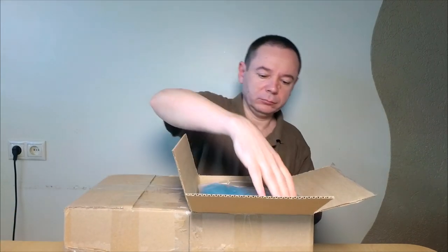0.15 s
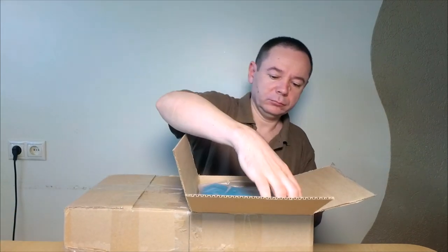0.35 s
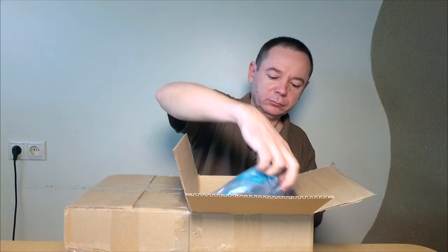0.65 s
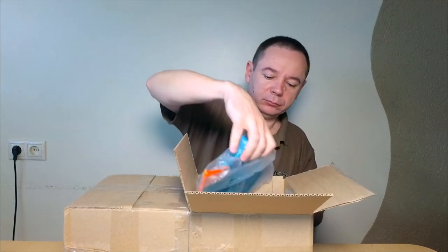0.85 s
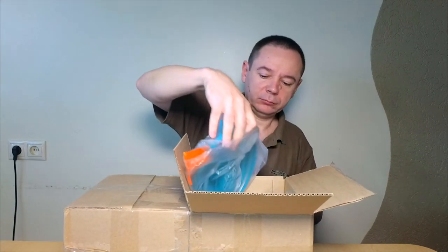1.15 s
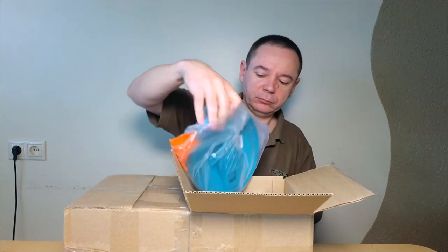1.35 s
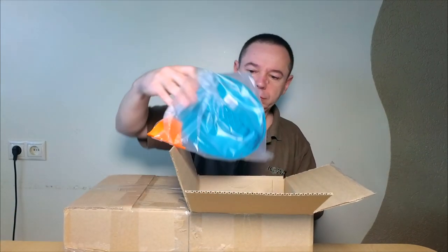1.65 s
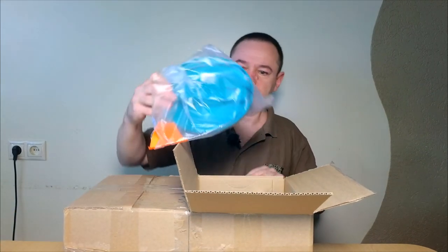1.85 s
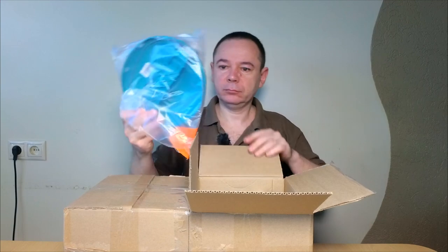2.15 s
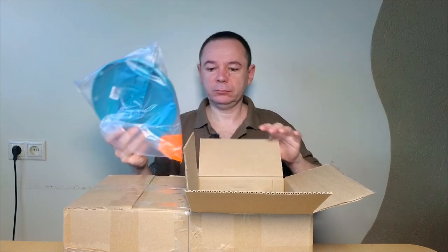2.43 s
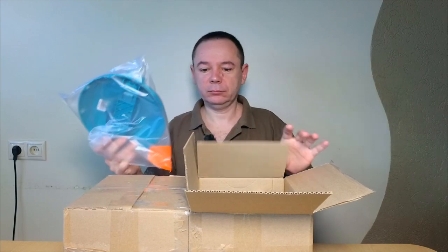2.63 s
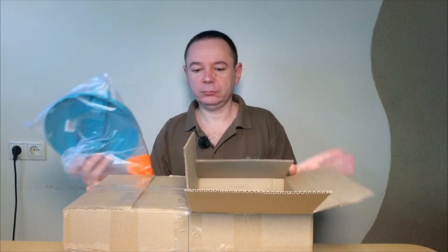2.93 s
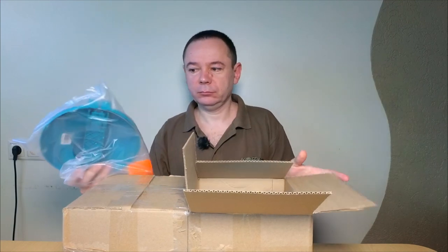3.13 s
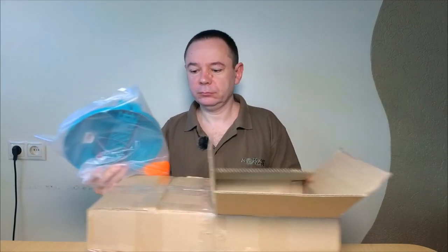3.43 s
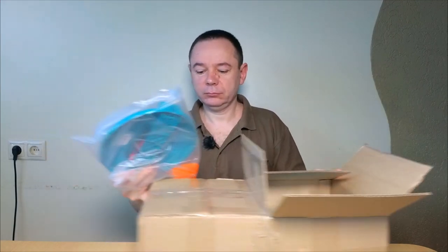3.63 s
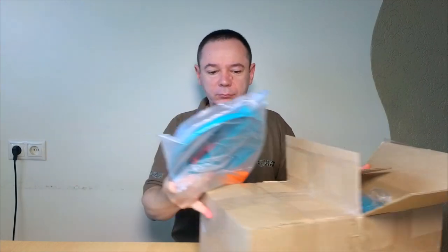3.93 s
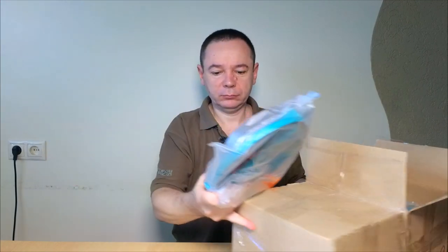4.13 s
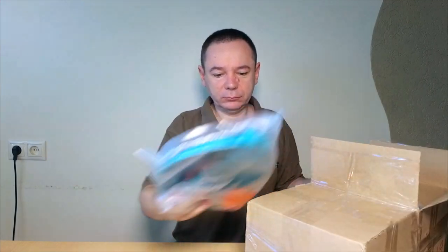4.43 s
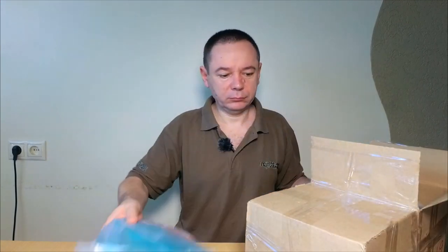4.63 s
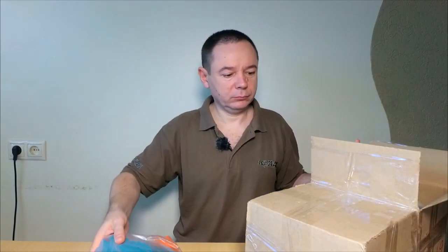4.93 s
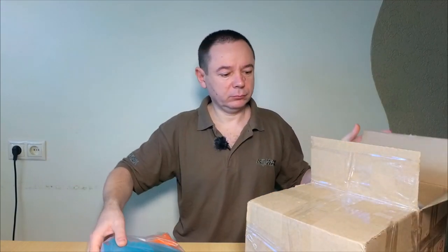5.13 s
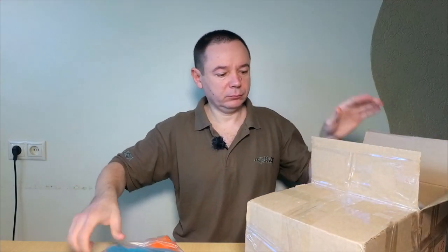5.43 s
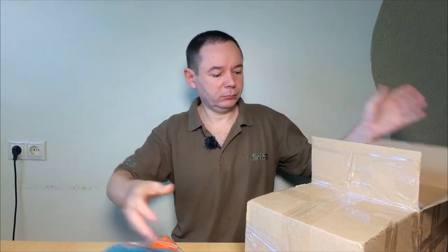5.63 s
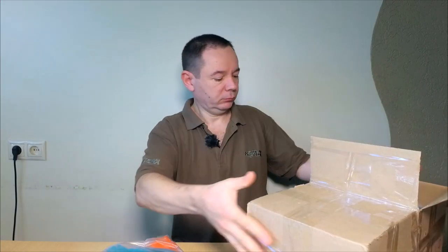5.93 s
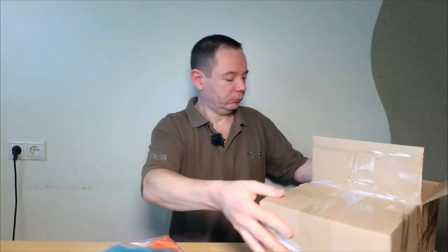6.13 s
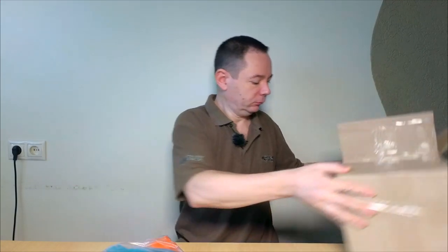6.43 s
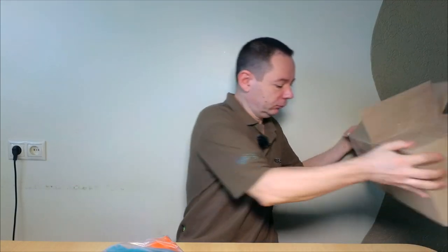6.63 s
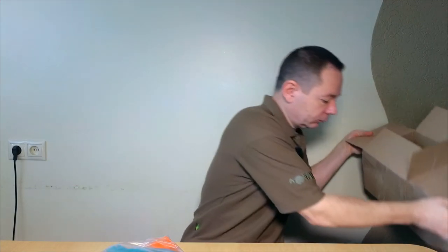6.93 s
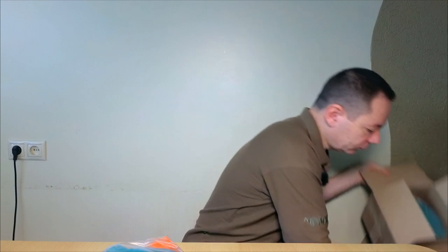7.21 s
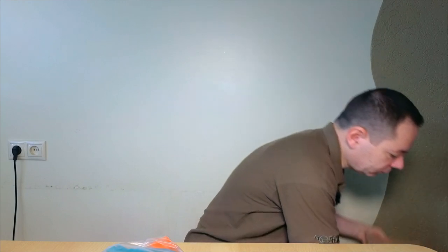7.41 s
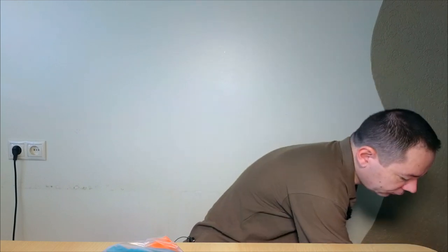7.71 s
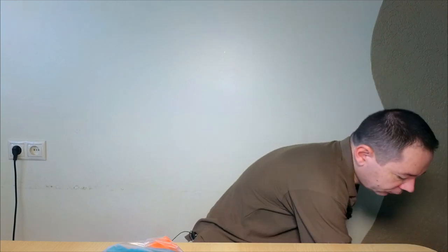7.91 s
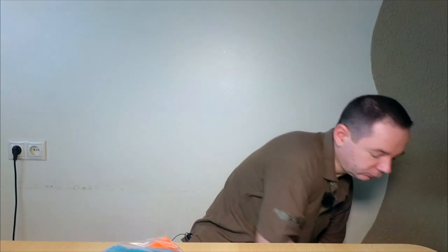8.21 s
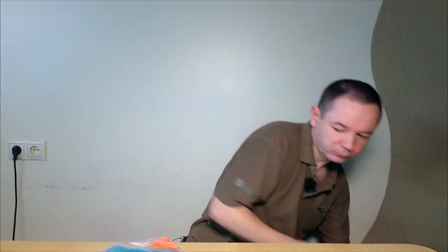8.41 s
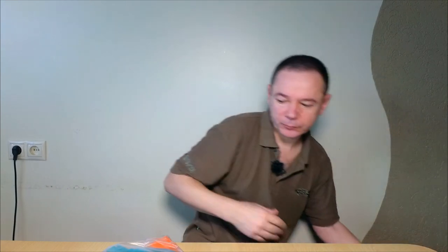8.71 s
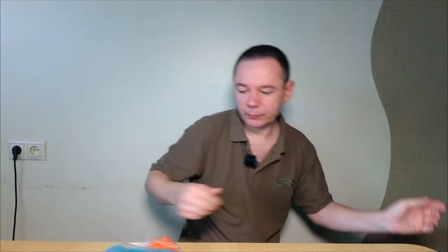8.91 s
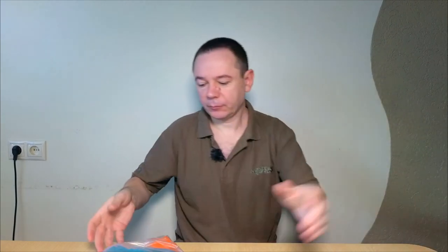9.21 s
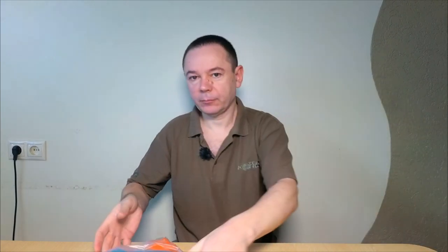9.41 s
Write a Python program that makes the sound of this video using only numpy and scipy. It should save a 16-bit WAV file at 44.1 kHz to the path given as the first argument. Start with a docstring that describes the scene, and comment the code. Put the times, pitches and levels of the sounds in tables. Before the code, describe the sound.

A small, fairly dry room with a low murmur and faint hiss, heard by a close microphone. After a near-silent start and a light knock at 0.4 s, plastic film bursts into dense, bright crackling from 0.5 to 1.5 s, with cardboard scraping and hollow knocks, strongest around 0.8. From 2 to 3.3 s come sparse crisp snaps, short rustles and light taps. A box slides with rough friction at about 3.4-4.1 s, with dull bumps. Film crackles again at 4.3-4.6 and more firmly at 5-5.4, with a sharp knock at 5.3. Cardboard shuffles and thuds at 5.7-6.3, including a tiny flap squeak near 5.95. A hollow bump falls at 6.8, then a loud boomy blow at 7.5 and the heaviest crashing, rattling thump at 8.0. Scrapes fade by 8.6; near quiet, then a small film rustle and tap at 9.4-9.5.

```python
"""Film crackles and snaps as hands lift a plastic-wrapped item out of a cardboard box, slide boxes and set them down.
Grains and bursts of noise make the film; clumped noise makes the cardboard rub and the hollow boxes rumble.
Ringing modes make the knocks, low decaying sines the thuds; a box slides on the table and a flap squeaks.
A small room answers with noise tails over a quiet murmur and hiss.
One close microphone feeds both channels; the right one cuts the bass."""
import sys
import numpy as np
from scipy import signal
from scipy.fft import rfft, irfft, next_fast_len
from scipy.io import wavfile
from scipy.ndimage import uniform_filter1d, map_coordinates

SR = 44100
rng = np.random.default_rng(int(sys.argv[2]) if len(sys.argv) > 2 else 0)


def persist_wave(psi):
    """Save psi, clipped to +-1, as 16-bit WAV."""
    counts = np.round(np.clip(psi, -1, 1) * 32767).astype(np.int16)
    wavfile.write(sys.argv[1], SR, np.atleast_2d(counts).T)


N = 421579  # length in samples


def amp(db):
    """Decibels to linear gain."""
    return 10 ** (np.asarray(db) / 20)


def unit(x):
    """x scaled to rms 1."""
    return x / np.sqrt(np.mean(x ** 2) + 1e-20)


def steady(x):
    """x with its slow level held at rms 1."""
    return x / np.sqrt(np.abs(uniform_filter1d(x * x, size=SR // 6)) + 1e-20)


def along(points, hz):
    """Read a curve of (Hz, value) points on a log frequency axis."""
    f, v = np.transpose(points)
    return np.interp(np.log(hz + 1), np.log(f + 1), v)


def curves(rows):
    """One value per sample for each column after the time."""
    s, *cols = np.transpose(rows)
    return [np.interp(np.arange(N) / SR, s, c) for c in cols]


def wobble(rate):
    """A smooth random curve, rate knots a second."""
    knots = rng.standard_normal(int(N * rate / SR) + 4)
    return map_coordinates(knots, [np.arange(N) * rate / SR])


def filtered(x, response):
    """x passed through a complex response of frequency."""
    m = next_fast_len(N + SR // 2)
    return irfft(rfft(x, m) * response(np.fft.rfftfreq(m, 1 / SR)), m)[..., :N]


def coloured(x, spectrum):
    """x shaped by a table of (Hz, dB) points."""
    return filtered(x, lambda hz: amp(along(spectrum, hz)))


def burst(hz, t60, octaves, size=1024):
    """A noise burst around hz that rises fast and falls 60 dB in t60 seconds."""
    t = np.arange(size) / SR
    f = np.fft.rfftfreq(size, 1 / SR) + 1
    band = np.exp(-.5 * (np.log2(f / hz) / octaves) ** 2)
    noise = irfft(rfft(rng.standard_normal(size)) * band)
    x = noise * amp(-60 * t / t60) * (1 - np.exp(-t / (0.053 * t60)))
    return x / np.abs(x).max()


RISE_DB = 23.5  # a move swells by this much before its hold


def swell(start, rise, hold, fall_db_per_s):
    """Gain of one move: a rise, a hold, a steady fall in dB."""
    t = np.arange(N) / SR - start
    rise, hold = max(rise, .003), max(hold, 0)
    rising_db = RISE_DB * (t / rise - 1)
    falling_db = np.minimum(0, -fall_db_per_s * (t - rise - hold))
    return amp(np.minimum(rising_db, falling_db)) * (t > 0)


def grainy(spectrum, spread_db, clump_db, clump_rate, smooth):
    """Tiny slips of very unequal size that come in clumps, over a smooth rub."""
    size = amp(spread_db * rng.standard_normal(N) + clump_db * wobble(clump_rate))
    slips = unit(size * rng.standard_normal(N))
    return steady(coloured(slips + smooth * rng.standard_normal(N), spectrum))


# Colour of the film. Each row: frequency in Hz, relative spectrum level in dB.
FILM_COLOUR = [(1180, -24.5), (2000, -3.5), (3090, -4), (3370, -5.5), (4530, -6.5), (6420, -2.5),
               (9660, -4.5), (15100, -14), (16000, -34.5)]
# Stretches with the bag in hand. Each row: start in seconds, end in seconds.
BAG_IN_HAND = [(.4, 3.4), (4.3, 5.55), (9.44, 9.6)]
CONTRAST_WITHOUT_BAG = 0.41  # share of the dB differences between grains, 1 with the bag


def crackle(count, spread_db, clump_db, smooth):
    """Creases of the film give way one by one, each in its own band, the big ones in clusters."""
    out = np.zeros(N + SR)
    luck = rng.random((count, 4))
    cluster = wobble(40)
    contrast = np.full(N, CONTRAST_WITHOUT_BAG)
    for start, end in BAG_IN_HAND:
        contrast[round(start * SR):round(end * SR)] = 1
    for where, pitch, life, size in luck:
        i = int(where * N)
        level_db = np.minimum(-spread_db * np.log(1 - size), 17) + clump_db * np.tanh(cluster[i])
        grain = burst(1800 * 8 ** pitch, .002 + .009 * life, .5)
        out[i:i + 1024] += amp(contrast[i] * level_db) * grain
    # equal grains per octave would tilt the colour
    white = steady(filtered(out[:N], lambda hz: np.sqrt(hz)))
    return steady(coloured(white + smooth * rng.standard_normal(N), FILM_COLOUR))


# Steady handling, chiefly the bag drawn out of the box.
# Each row: time in seconds, film crackle in dB, cardboard rub in dB, box body in dB.
STEADY_HANDLING = [(0, -66, -58, -60.5), (.3, -62, -63, -60), (.4, -47.5, -50.5, -47),
                   (.53, -25.5, -30, -30), (.62, -24.5, -25, -25), (.8, -21.5, -21, -21.5),
                   (.93, -25.5, -28.5, -31), (1.2, -31.5, -34, -33), (1.47, -29.5, -32.5, -41.5),
                   (1.56, -39.5, -43, -51), (1.78, -44, -45, -53), (2.02, -50.5, -51.5, -54),
                   (3.38, -50, -49, -47.5), (3.7, -44.5, -32, -40.5), (4.4, -41.5, -43.5, -39),
                   (4.9, -52, -50, -55), (5.7, -73, -59, -57), (6.6, -61.5, -56.5, -57.5),
                   (7, -62.5, -48, -45.5), (7.8, -49.5, -52, -48.5), (8.75, -49, -48.5, -50),
                   (9.37, -84.5, -68, -61)]
# Separate grips of the bag and shoves of the boxes.
# Each row: start in seconds, rise in seconds, hold in seconds, film in dB, rub in dB, body in dB.
GRIPS_AND_SHOVES = [(1.575, .015, 0.072, -37.5, -50, -45.5), (2.035, 0.01, 0.025, -30.5, -37.5, -44),
                    (2.09, .03, 0.042, -35, -33, -43.5), (2.266, 0.023, 0.011, -30, -31, -31.5),
                    (2.388, 0.04, 0.043, -45, -50, -66), (2.475, 0.13, 0.041, -33, -37, -45),
                    (2.661, 0.018, 0.063, -32.5, -35.5, -39), (2.937, 0.024, 0.094, -44.5, -44.5, -45.5),
                    (3.18, 0.016, 0.086, -47.5, -58, -62), (4.283, 0.014, 0.06, -35, -42, -45),
                    (4.407, 0.017, 0.02, -34.5, -41, -36), (4.526, .04, 0.11, -26.5, -37.5, -45.5),
                    (4.906, 0.018, 0.012, -31, -38, -51), (5.027, 0.073, 0.22, -28.5, -30.5, -39.5),
                    (5.334, 0.081, 0.052, -26, -23.5, -45), (5.739, 0.014, 0.055, -42.5, -35, -50),
                    (5.867, 0.072, 0.17, -48.5, -42.5, -40), (6.057, 0.016, 0.094, -39.5, -32.5, -28),
                    (6.198, 0.026, .2, -37, -28.5, -27), (6.655, 0.029, 0.089, -51.5, -45.5, -39.5),
                    (6.762, 0.01, 0.075, -39.5, -40, -28), (7.093, .006, 0.01, -48.5, -52, -40.5),
                    (7.411, 0.059, 0.096, -30.5, -30, -23.5), (7.853, 0.15, 0.079, -29.5, -39, -28),
                    (7.994, 0.072, .11, -24, -17.5, -12), (8.21, 0.01, 0.24, -33.5, -34, -34.5),
                    (8.469, 0.0081, 0.079, -39.5, -34, -38), (8.593, 0.028, 0.041, -46.5, -46, -40),
                    (9.424, 0.047, .1, -37.5, -39, -44.5)]
MOVE_FALL_DB_PER_S = 185
# Colours of the rubbed cardboard, the hollow box bodies, the boom of the big box and the ground below it.
# Each row: frequency in Hz, relative spectrum level in dB.
CARDBOARD_COLOUR = [(410, -13.5), (700, 6), (978, 7.5), (1200, 5.5), (1520, 8), (1850, 6), (3100, -3),
                    (4500, -5), (5850, -7), (9900, -120)]
BODY_COLOUR = [(150, -15.5), (250, -14), (366, -7), (448, -4), (573, -7.5), (786, -11.5), (1170, -16),
               (1400, -21), (1820, -39.5), (3080, -120)]
BOOM_COLOUR = [(59, -42), (100, -16), (178, -0.5), (227, 2.5), (276, 1), (330, -8.5), (430, -16.5),
               (730, -120)]
GROUND_COLOUR = [(13, -49), (22, -8.5), (32, -13), (97, -7), (120, 4), (160, -31.5), (260, -120)]
# the boom has BOOM_DB at body level HARD_DB and drops off faster than the body below it
BOOM_DB, HARD_DB, BOOM_GROWTH = -10, -9.5, 1.51


def handling():
    """Film crackles in spiky grains, cardboard rubs more evenly, the hollow boxes rumble."""
    power = amp(curves(STEADY_HANDLING)) ** 2
    for start, rise, hold, *levels_db in GRIPS_AND_SHOVES:
        power += np.outer(amp(levels_db), swell(start, rise, hold, MOVE_FALL_DB_PER_S)) ** 2
    film_gain, card_gain, body_gain = np.sqrt(power)
    boom_gain = amp(BOOM_DB) * (body_gain / amp(HARD_DB)) ** BOOM_GROWTH
    ground_gain = boom_gain * amp(-19)

    film = film_gain * crackle(count=9000, spread_db=4.5, clump_db=8.0, smooth=1.0)
    card = card_gain * grainy(CARDBOARD_COLOUR, spread_db=6.5, clump_db=4, clump_rate=70, smooth=0.69)
    body = body_gain * grainy(BODY_COLOUR, spread_db=6.5, clump_db=2, clump_rate=45, smooth=0.64)
    boom = boom_gain * grainy(BOOM_COLOUR, spread_db=3, clump_db=7.0, clump_rate=25, smooth=0.35)
    ground = ground_gain * grainy(GROUND_COLOUR, spread_db=7.5, clump_db=8.0, clump_rate=14, smooth=0.34)
    return film + card + body + boom + ground


# Colour of the background. Each row: frequency in Hz, relative spectrum level in dB.
QUIET_COLOUR = [(15, -53.5), (25, -22.5), (53, 11.5), (76, -5.5), (92, 7.5), (560, -6), (659, -21.5),
                (887, -2.5), (1370, -30), (8360, -25), (16000, -52.5)]
QUIET_DB = -54.5  # rms


def quiet():
    """The steady murmur of the room and the hiss of the microphone, as shaped noise."""
    return amp(QUIET_DB) * unit(coloured(rng.standard_normal(N), QUIET_COLOUR))


# Decay of the room. Each row: frequency in Hz, time to fall 60 dB in seconds.
WALL_DECAY = [(200, 0.45), (1000, 0.3), (4000, 0.15), (12000, 0.083)]


def room(x):
    """Each frequency of the walls' answer dies at its own speed; a fresh noise tail is drawn every third of a second."""
    out, step = np.zeros(N + 2 * SR), SR // 3
    for i in range(0, N, step):
        hz, t, z = signal.stft(rng.standard_normal(SR // 2), SR, nperseg=256)
        fade = amp(-60 * t / along(WALL_DECAY, hz)[:, None])
        tail = signal.istft(z * fade, SR, nperseg=256)[1]
        wet = signal.fftconvolve(x[i:i + step], tail / np.linalg.norm(tail))
        out[i + 250:][:len(wet)] += wet  # the answer lags by 250 samples
    return out[:N]


# Knocks on the cardboard. Each row: start in seconds, ring peak in dB, frequency in Hz where it rings most,
# slap in dB against the ring, rattle of loose flaps in dB against the ring.
KNOCKS = [(0.358, -21.5, 450, -18, -5), (0.664, -11.5, 800, 8, -9), (0.788, -11.5, 686, -14, -6),
          (1.089, -34, 511, -10, -11), (1.176, -22.5, 526, -1, -8), (1.329, -19, 423, -14, -8),
          (1.577, -22, 354, -21, -16), (1.836, -37.5, 450, -10, -5), (2.228, -27.5, 493, 6, -7),
          (2.293, -27.5, 764, 7, -19), (2.697, -23.5, 500, -15, -23), (3.286, -32, 443, -7, -8),
          (3.455, -20.5, 227, -10, -11), (3.539, -19.5, 396, -10, -7.5), (3.993, -24.5, 500, -4, -9),
          (4.248, -27, 385, -13, -9), (4.443, -22.5, 366, -2, -11), (4.547, -24, 510, -16, -21),
          (4.607, -27, 825, 7, -23), (4.919, -30.5, 670, -3, -8), (5.344, -6.5, 440, -7, -7),
          (5.373, -20, 468, -20, -3), (5.74, -17.5, 143, -14, -5), (5.754, -14.5, 470, -22, -5),
          (5.979, -25.5, 430, -1, -7), (6.083, -16, 424, -14, -4), (6.119, -10.5, 164, -7, -10),
          (6.23, -12.5, 417, -1.5, -2.5), (6.694, -21, 387, -18, -7), (6.74, -23, 580, -19, -9),
          (6.78, -7.5, 286, -12, -11), (6.863, -22, 233, -2.5, -11), (7.102, -18, 403, -18, -16),
          (7.129, -24.5, 159, -15, -22), (7.464, -15, 680, -21, -16), (7.532, 3.5, 297, -21, -13),
          (7.966, -18, 147.5, -5, -3), (7.996, -17, 665, -13, -11), (8.018, 2, 287, -12, -11),
          (8.047, 3, 544, -3, -4), (8.084, -4.5, 560, -14, 6), (8.496, -16, 444, -6, -14),
          (9.006, -40, 710, -14, -9), (9.517, -20, 660, 1, -15)]
# Ringing modes of the box walls. Each entry: frequency in Hz.
WALL_MODES = [150, 178, 207, 235, 272, 330, 386, 460, 523, 610, 695, 808, 991, 1255, 1430, 1650]
KNOCK_T60 = .042  # seconds to fall 60 dB at the knock's own pitch


def knocks():
    """Each blow rings the modes near its pitch most, with a papery slap; loose flaps keep the modes stirring."""
    out, t = np.zeros(N + SR), np.arange(SR // 3) / SR
    modes = np.array(WALL_MODES)[:, None]
    for s, db, hz, slap_db, rattle_db in KNOCKS:
        above = np.log2(modes / hz)  # octaves; a blow reaches further up than down
        share = amp(np.minimum(21 * above, -6 * above) + 2 * rng.standard_normal(modes.shape))
        fade = amp(-60 * t / KNOCK_T60 * (modes / hz) ** 0.84)  # higher modes die sooner
        ring = (share * fade * np.sin(2 * np.pi * modes * t)).sum(axis=0)
        ring = ring * (1 - np.exp(-t / 0.0031))
        flaps = burst(hz, 4.05 * KNOCK_T60, 1.3, size=len(t))
        rattle = signal.fftconvolve(flaps, ring * amp(-60 * t / 0.046))[:len(t)]
        knock = ring / np.abs(ring).max() + amp(rattle_db) * rattle / np.abs(rattle).max()
        i = round(s * SR)
        out[i:][:len(t)] += amp(db) * knock
        out[i:i + 4096] += amp(db + slap_db) * burst(1000, 0.039, 0.98, size=4096)
    return out[:N]


# Table and floor take a weight. Each row: start in seconds, peak in dB.
THUDS = [(0.359, -35), (0.648, -43), (1.081, -35), (2.557, -35), (2.698, -44), (3.13, -43), (3.468, -34),
         (3.538, -40), (5.178, -32), (5.335, -29), (5.738, -24), (5.979, -35), (6.07, -44), (6.237, -24),
         (6.378, -53), (6.778, -35), (7.111, -48), (7.497, -31), (8.007, -8.5), (8.048, -28), (8.481, -44)]
THUD_HZ, THUD_SCATTER = 83, 0.046  # mean pitch, standard deviation as a share of it


def thuds():
    """A soft low push that dies away as a decaying sine."""
    out, t = np.zeros(N + SR), np.arange(SR // 3) / SR
    for s, db in THUDS:
        hz = THUD_HZ * (1 + THUD_SCATTER * rng.standard_normal())
        push = amp(-60 * t / 0.18) * np.sin(2 * np.pi * hz * t) * (1 - np.exp(-t / 0.0036))
        out[round(s * SR):][:len(t)] += amp(db) * push / np.abs(push).max()
    return out[:N]


# Folds of film that snap. Each row: start in seconds, peak in dB, centre in Hz.
FILM_SNAPS = [(0.4858, -11, 3240), (0.5466, -12.5, 3570), (0.5638, -12, 3170), (0.5977, -4, 8630),
              (0.6656, -12, 2740), (0.761, -14.5, 2260), (0.7886, -5, 3040), (0.8, -0.5, 2810),
              (0.835, -5.5, 2380), (0.943, -12.5, 2330), (1.052, -10.5, 7500), (1.1965, -14.5, 8400),
              (1.2237, -13, 7800), (1.2514, -14, 7900), (1.3902, -10.5, 7400), (1.444, -13.5, 9720),
              (1.525, -14, 6860), (1.5883, -19.5, 9530), (1.6207, -16.5, 7800), (1.9046, -18, 6010),
              (2.016, -25.5, 6650), (2.0425, -17.5, 6550), (2.0548, -6.5, 6340), (2.1221, -15.5, 5340),
              (2.182, -16, 7030), (2.2254, -12, 6500), (2.285, -16.5, 2430), (2.2947, -18.5, 3020),
              (2.425, -18, 5300), (2.5293, -16, 6200), (2.577, -23, 5210), (2.592, -18.5, 7210),
              (2.6223, -13, 5930), (2.6747, -16, 8690), (2.7197, -13, 6310), (2.733, -12.5, 7870),
              (2.9205, -23, 3350), (2.9701, -21, 9870), (3.0438, -15.5, 9300), (3.079, -19, 7430),
              (3.1188, -23, 8400), (3.1898, -19, 10200), (3.2598, -22.5, 8600), (3.2903, -19, 2170),
              (3.317, -22, 4900), (4.2998, -11, 6230), (4.376, -13, 6280), (4.5133, -16.5, 8070),
              (4.5443, -18.5, 7740), (4.549, -19.5, 4860), (4.57, -15, 8210), (4.632, -17, 6730),
              (4.913, -15.5, 9700), (4.9228, -17, 3640), (5.0514, -25, 4050), (5.0743, -12.5, 3980),
              (5.1432, -19.5, 2430), (5.1701, -8.5, 2360), (5.227, -5, 4300), (5.2861, -6, 3740),
              (5.3968, -11.5, 2460), (5.5962, -27.5, 5060), (5.775, -24, 3260), (6.098, -17, 2450),
              (6.2178, -19.5, 3090), (6.77, -23, 2460), (7.034, -19.5, 8650), (7.436, -26.5, 3300),
              (7.52, -12, 6660), (7.7069, -22, 6400), (7.9269, -16, 9100), (8.0227, -16.5, 3320),
              (8.048, -7.5, 3380), (9.418, -36, 6300), (9.4484, -21.5, 2270), (9.4702, -16, 2130)]


def snaps():
    """A fold buckles: a hard, wide click and a burst in its own band; low folds last longer."""
    out = np.zeros(N + SR)
    for s, db, hz in FILM_SNAPS:
        t60 = 0.01 * (6000 / hz) ** 0.29
        click = burst(8000, .004, .8, size=2048)
        fold = burst(hz, t60, 0.35, size=2048) + click
        out[round(s * SR):][:len(fold)] += amp(db) * fold / np.abs(fold).max()
    return out[:N]


# A box slides over the table top. One row: rise in seconds, hold in seconds, level in dB.
SLIDE_SHAPE = (.14, 0.51, -35)
# Resonances of the box bottom. Each row: centre in Hz, width in Hz, level in dB.
BOTTOM_RESONANCES = [(1288, 42, -2), (1660, 170, 9.5), (2390, 630, -4.5), (3750, 290, -3.5),
                     (8100, 1000, -13.5), (11800, 4700, -10.5)]
SLIDE_START_S, SLIDE_FALL_DB_PER_S = 3.42, 75


def slide():
    """Rough friction on the table top excites the resonances of the box bottom."""
    def bottom(f):
        total = 0
        for k, (centre, width, db) in enumerate(BOTTOM_RESONANCES):
            damping = 1j * f * width
            total = total + (-1) ** k * amp(db) * damping / (centre * centre - f * f + damping)
        return total

    rise, hold, level_db = SLIDE_SHAPE
    rough = amp(1.6 * wobble(30) + 1.4 * wobble(150) + 2.6 * rng.standard_normal(N))
    friction = unit(filtered(rough * rng.standard_normal(N), bottom))
    return amp(level_db) * swell(SLIDE_START_S, rise, hold, SLIDE_FALL_DB_PER_S) * friction


SQUEAK_START_S, SQUEAK_HZ, SQUEAK_DB = 5.952, 1400, -33  # a flap squeaks; mean pitch and level


def squeak():
    """Stick and slip at an unsteady rate: a fuzzy line with weak lines at half and one and a half the rate."""
    turn = 2 * np.pi * np.cumsum(SQUEAK_HZ * (1 + 0.0223 * wobble(250))) / SR
    line = np.sin(turn) + 0.16 * np.sin(turn / 2) + 0.19 * np.sin(turn * 3 / 2)
    gain = amp(SQUEAK_DB + 2.6 * wobble(92))
    return gain * line * swell(SQUEAK_START_S, rise=0.014, hold=0.058, fall_db_per_s=1095)


def scene():
    """Sum the sources, the room's answer and the background, the same for both channels."""
    hits = snaps() + knocks()
    rubs = handling() + slide() + squeak()
    answer = room(amp(-8.0) * hits + amp(-16.5) * rubs)
    mono = hits + thuds() + rubs + answer + quiet()
    return np.array([mono, mono])


LOW_HZ, BASS_CUT_HZ, TOP_HZ = 88, 168, 15900  # microphone low cut, right channel bass cut, band limit


def record(dry):
    """The microphone drops deep bass, the right channel cuts more; loud blows clip softly; the top is cut off."""
    damping, leak, alike_hz = 1.82, 0.18, 1310

    def microphone(hz):
        low_cut = (1j * hz / (LOW_HZ + 1j * hz)) ** 2
        return low_cut / np.sqrt(1 + (hz / 14500) ** 6)

    def right(hz):
        high_pass = -hz * hz / (BASS_CUT_HZ ** 2 - hz * hz + 1j * damping * BASS_CUT_HZ * hz)
        bass_cut = (leak + high_pass) / (1 + leak)
        # well above alike_hz both sides are the same
        return 1 + (bass_cut - 1) / (1 + (hz / alike_hz) ** 4)

    dry = filtered(dry, microphone)
    pair = np.array([dry[0], filtered(dry[1], right)])
    pair = pair / (1 + np.abs(pair) ** 8) ** (1 / 8)
    return filtered(pair, lambda hz: hz < TOP_HZ)


dry = scene()
out = record(dry)
persist_wave(out)
```